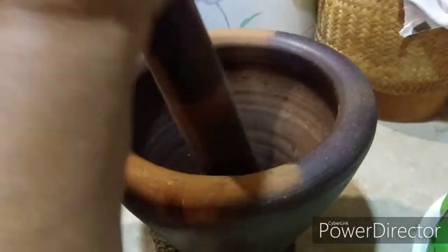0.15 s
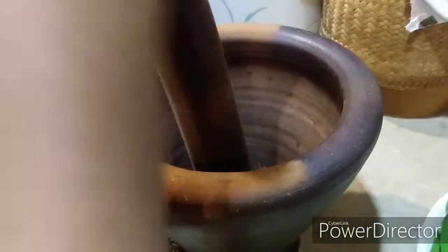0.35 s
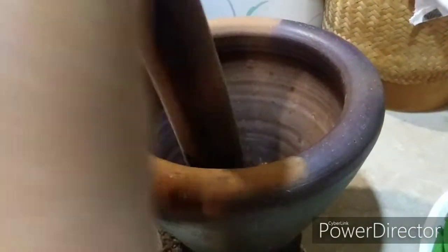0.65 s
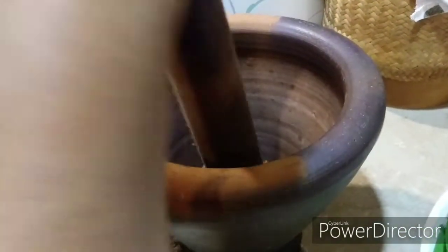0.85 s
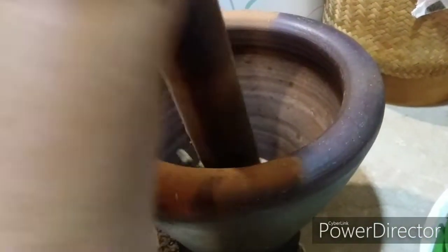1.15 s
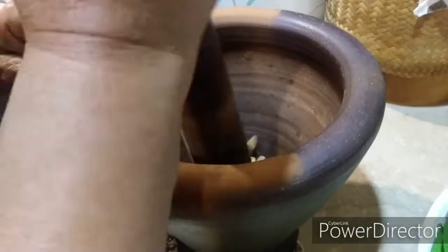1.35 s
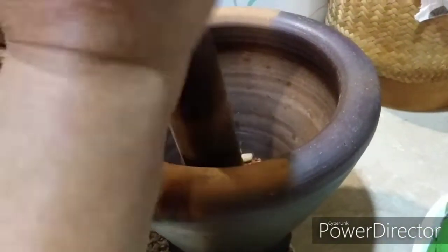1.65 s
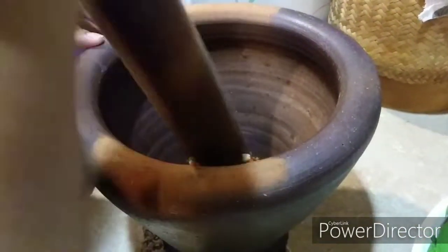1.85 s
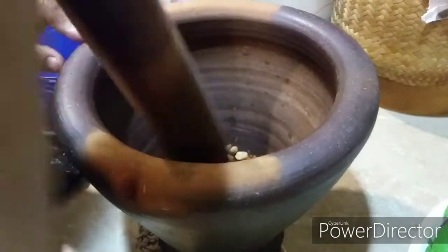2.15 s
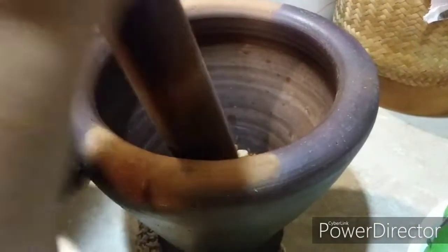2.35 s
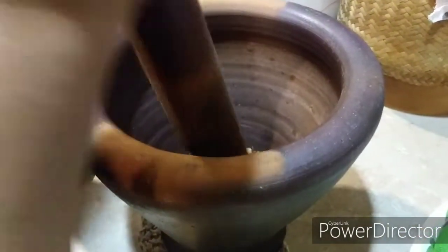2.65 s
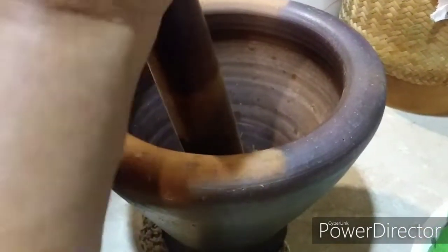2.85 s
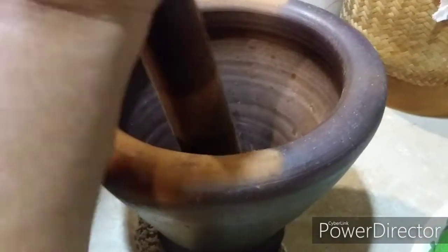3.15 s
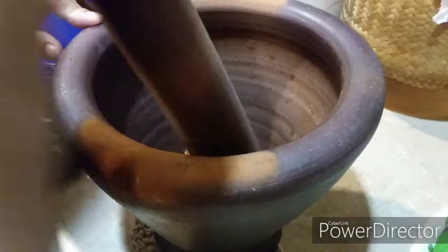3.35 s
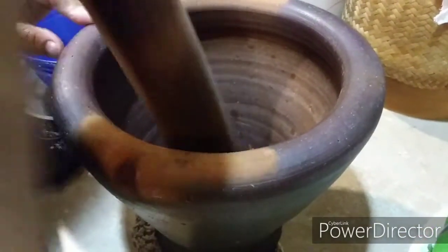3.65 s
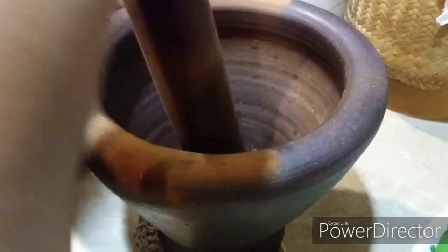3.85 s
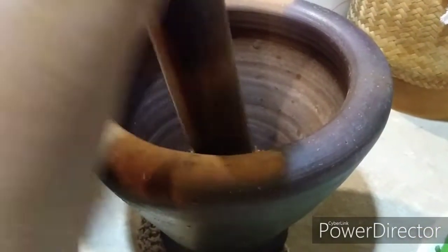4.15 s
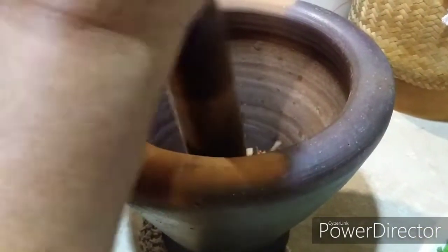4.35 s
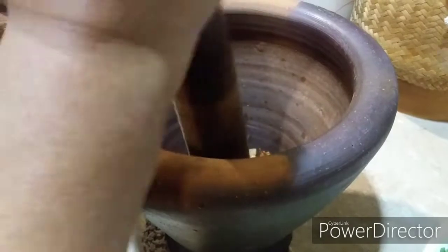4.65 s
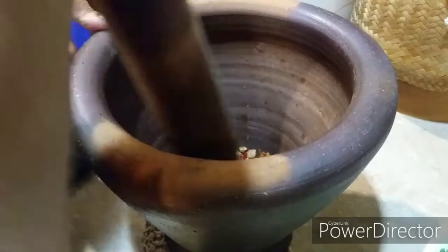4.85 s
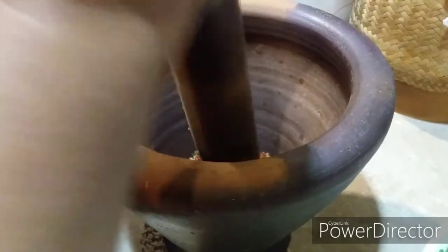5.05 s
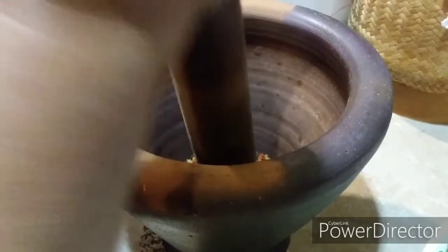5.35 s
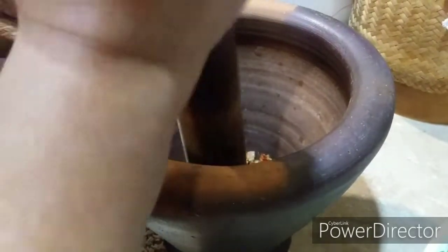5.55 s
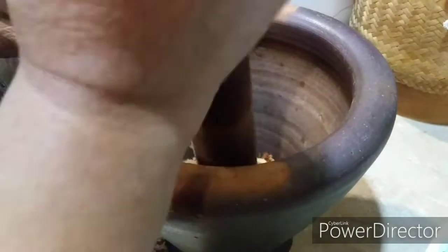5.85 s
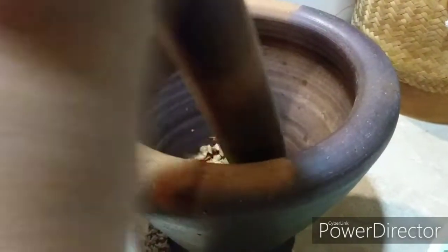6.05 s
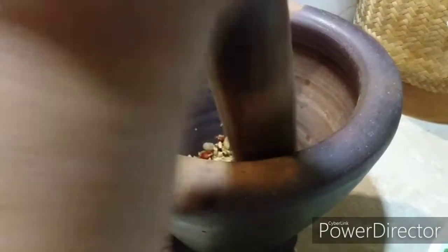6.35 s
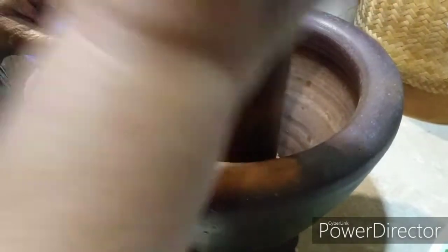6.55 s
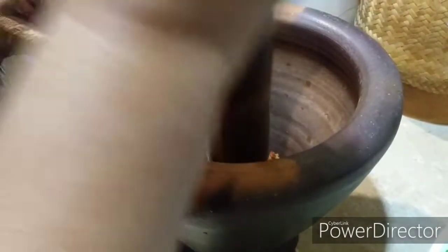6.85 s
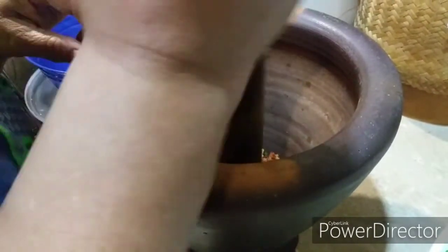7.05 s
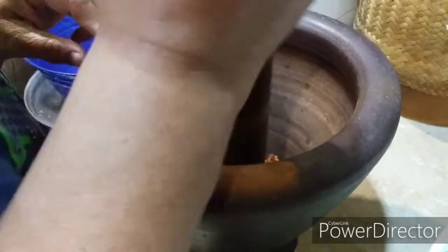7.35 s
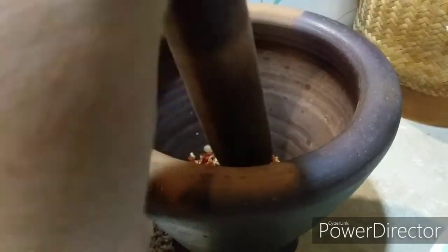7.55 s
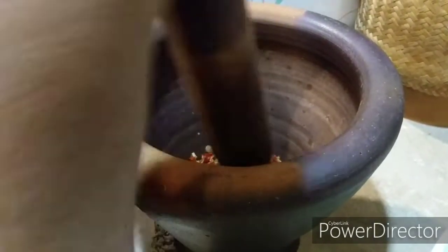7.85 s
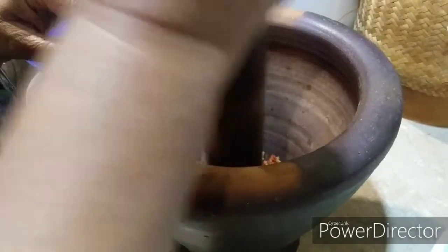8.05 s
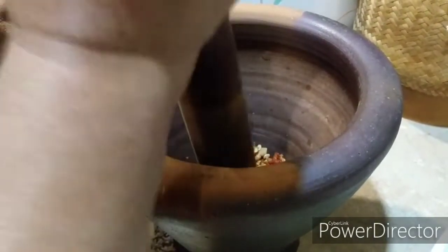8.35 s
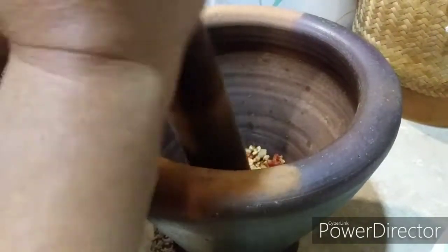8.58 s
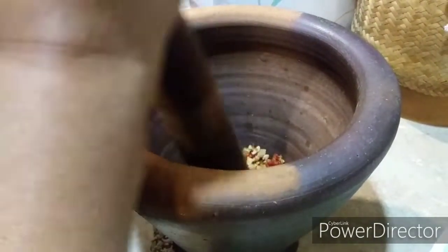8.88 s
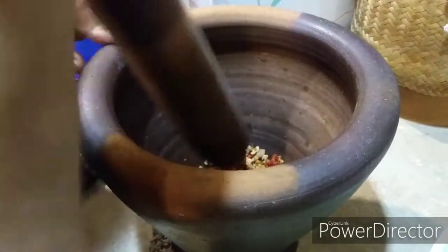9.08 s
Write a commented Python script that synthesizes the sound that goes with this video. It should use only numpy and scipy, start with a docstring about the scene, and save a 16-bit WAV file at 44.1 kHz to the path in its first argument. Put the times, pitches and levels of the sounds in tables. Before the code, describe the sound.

Close, even pounding of garlic and chilli in a clay mortar: bright crunches, hollow thuds and a few sharp raps of wood on clay.

```python
"""Pounding garlic and chilli

A wooden pestle works a clay mortar, a little over three strokes a second. Each stroke crushes the food
with a bright crunch and thuds through the mortar into the floor; some glance off the clay wall.
Crumbs tick and a plastic cup is jogged between strokes. A small hard room answers, and the close
microphone rings near 9 kHz."""
import sys
import numpy as np
from scipy import signal
from scipy.fft import rfft, irfft, next_fast_len
from scipy.io import wavfile

SR = 44100
rng = np.random.default_rng(int(sys.argv[2]) if len(sys.argv) > 2 else 0)


def wav_out(sig):
    """Save sig, one row per channel (or a flat mono array), as 16-bit PCM at SR to the path in sys.argv[1]."""
    wavfile.write(sys.argv[1], SR, np.round(np.clip(np.atleast_2d(sig).T, -1, 1) * 32767).astype(np.int16))


N = 406602
T = np.arange(SR // 2) / SR  # seconds within one hit

# Cue sheets; levels are relative within each layer.
# The pestle lands on the food. Each row: start in seconds, rise time and crush length in seconds,
# crunch level in dB, fall of the force over the crush in dB (negative swells), thud level in dB.
STROKES = [(0.465, 0.0048, 0.018, -17, 12.5, -40), (0.767, 0.0022, 0.019, -14.5, 0, -41),
           (1.055, .0005, .04, -17.5, -11, -41), (1.373, .0003, .023, -16, -13, -36.5),
           (1.673, 0.0021, 0.021, -15, -5, -35.5), (1.975, 0.0025, 0.017, -14, 0.5, -38),
           (2.28, 0.0014, 0.022, -16.5, 6, -36), (2.577, 0.00026, 0.022, -14, 4, -40.5),
           (2.861, 0.0015, 0.024, -15, -7.5, -37), (3.167, 0.0024, .016, -13, 8.5, -37.5),
           (3.453, 0.002, 0.032, -14.5, -4.5, -36.5), (3.777, 0.0027, 0.016, -14, 2, -37.5),
           (4.089, 0.0014, 0.015, -13, 4, -36), (4.392, 0.00088, 0.026, -14, 6.5, -36),
           (4.688, .0008, 0.025, -13, -1, -33), (4.984, 0.0012, 0.025, -15.5, 2.5, -37),
           (5.284, 0.0015, 0.016, -14, 3, -37), (5.5816, 0.00027, .021, -15, 11, -32.5),
           (5.858, 0.0012, .034, -23.5, -23.5, -36.5), (6.169, 0.0012, 0.026, -18.5, 1.5, -40),
           (6.483, .001, 0.016, -18.5, -15, -33), (6.773, 0.0012, 0.039, -20.5, -17, -38.5),
           (7.104, 0.0017, .026, -15, 2.5, -29), (7.393, .0003, 0.024, -14, 4, -40.5),
           (7.709, 0.0017, 0.023, -14.5, 9.5, -33), (8.016, 0.0013, 0.011, -13.5, 4, -36),
           (8.304, 0.0021, .029, -14, 1.5, -37), (8.609, .0003, 0.032, -23, -16.5, -38),
           (8.928, 0.0014, 0.017, -18, -4, -33)]
# Big pieces crack. Each row: start in seconds, level in dB, pitch of the pocket under the pestle in Hz.
SNAPS = [(.4624, -4, 2700), (.7733, -6.5, 2720), (1.6788, -10.5, 2530), (2.2802, -4, 4150),
         (2.8697, -6.5, 4570), (3.4823, -10.5, 4070), (4.9843, -11.5, 2360), (6.1921, -5.5, 3300),
         (6.8093, -7.5, 3430), (7.1048, -6, 4820), (7.3945, -5.5, 4080), (7.7098, -10, 2090),
         (8.017, -9.5, 2720), (8.636, -3, 2380), (8.9322, -5.5, 2340)]
# Wood meets bare clay. Each row: start in seconds, level in dB, time scale of the decay in seconds,
# brightness of the rap in dB per octave, level of the hollow thock in dB.
KNOCKS = [(.447, -33.5, .026, 8.5, -66), (0.464, -23, .018, 12.5, -37.5), (1.3755, -15.5, .025, -12, -27),
          (5.5816, -27, .12, -1, -28.5), (5.857, -8, 0.036, -4, -37.5), (6.173, -11.5, 0.33, -2.5, -29.5),
          (6.478, -8.5, 0.15, -3.5, -30), (6.7773, -7, 0.1, 0, -34.5), (7.394, -16.5, 0.024, -3, -54),
          (8.306, -18.5, 0.058, -10, -34.5), (8.6075, -9.5, 0.46, 1, -31.5), (8.931, -16, .044, -25, -27)]
# Small business around the strokes. Each row: start in seconds, level in dB.
HANDLING_BUMPS = [(.180, -36), (0.196, -41.5), (7.214, -41), (7.303, -46.5)]
CUP_JOGS = [(1.15, -32), (1.196, -29.5), (1.254, -38), (1.495, -37), (5.943, -39.5), (5.992, -37.5),
            (6.25, -29), (6.379, -35)]
TICKS = [(0.161, -48), (.32, -40.5), (0.648, -52), (.701, -41), (1.206, -14.5), (1.250, -28.5),
         (1.335, -32.5), (1.547, -32), (1.616, -29.5), (2.537, -41), (4.279, -43.5), (5.991, -33.5),
         (6.247, -22.5), (6.379, -32.5), (8.373, -28)]  # sharp and thin, some from crumbs, some from the cup's taps
# Loose food slides. Each row: crest of the swell in seconds, level in dB.
SLIDES = [(.08, -65.5), (1.18, -53.5), (5.82, -66.5), (7.601, -73.5)]

# Resonances. Each row: pitch in Hz, relative level in dB, time to die away by 60 dB in seconds.
STAND_AND_FLOOR_MODES = [(64, -9.5, 0.2), (84, -2.5, 0.15), (115.5, -7, 0.46), (140.6, 0, 0.4),
                         (166.8, -3.5, 0.2), (211.3, -10, 0.4), (255.7, -0.5, 0.23), (278.8, -6, 0.25),
                         (305, -4, 0.28), (336, -10, 0.51)]
HOLLOW_MODES = [(376, -10.5, 0.1), (431, 0, 0.1), (457.6, 1.5, 0.17), (504, 3, 0.14), (517.4, -1.5, 0.07),
                (594.3, -1, 0.16), (743, -10, 0.15), (841, -13.5, .18), (947, -11, 0.26),
                (1032, -13.5, 0.31)]  # the hollow of the bowl
PESTLE_MODES = [(1101, -18.5, 0.0055), (1310, -3, 0.018), (2238, -8.5, 0.012), (3130, -11, 0.019)]
CLAY_MODES = [(565, -5, 0.33), (810, -20.5, 0.22), (967, -1, 0.43), (980, -2.5, .2), (1025, 6.5, 0.54),
              (1178, -7, 0.86), (1350, 4, 0.46), (1285, 7, 0.25), (1500, -8, 0.084), (1465, -12.5, 0.14),
              (1750, -14, 1), (2030, -14.5, 0.3), (2120, -4.5, 0.97), (2225, -1, 0.2), (2500, -12, 0.28),
              (2450, 5.5, 0.23), (2470, -12.5, 0.85), (2480, -10.5, .2), (3210, 3, 0.24)]
CUP_MODES = [(2700, -1, .05), (3200, 0, .05), (3830, -10, .04), (4240, -6, .045), (5800, -15, .035)]

# Noise colours. Each row: frequency in Hz, relative level in dB.
CRISP_EQ = [(300, -22.5), (1500, -0.5), (4000, -7.5), (6000, -5), (8000, 3), (10000, 5), (12500, -6),
            (15500, -7)]  # brittle top end
JUICE_EQ = [(200, -16.5), (650, -22.5), (900, -10.5), (1100, -12), (1300, 1.5), (1650, -5), (2400, 5.5),
            (3300, 0), (4250, 4.5), (5500, -8), (9000, -15), (15000, -50)]  # wet midrange, also the cup's scratch
PUSH_EQ = [(25, -25.5), (60, -3.5), (150, 0.5), (300, -3.5), (450, -2), (800, -8.5), (3000, -41.5),
           (8000, -69)]  # low weight of a blow
THOCK_EQ = [(100, -19), (330, 3), (520, -5.5), (680, -10.5), (900, -6.5), (1400, -12), (2500, -14),
            (8000, -53)]  # dull, hollow body
CRACK_EQ = [(100, -31), (500, -18), (700, -6), (1000, -3), (1150, -6), (1350, 4.5), (1700, -1.5), (2300, 7),
            (3000, -12.5), (4200, -13.5), (6000, -32.5), (10000, -37.5)]  # wood on clay
TICK_EQ = [(500, -31.5), (2500, -11), (6000, -11.5), (7800, -1.5), (10000, -2.5), (12000, -11),
           (15500, -12)]  # thin ticks and rustle
AIR_EQ = [(25, -40.5), (60, -13.5), (140, -4.5), (200, -6), (310, 2.5), (500, -6.5), (1000, -12.5),
          (2400, -11.5), (5500, -22), (9000, -32), (15000, -24.5)]  # room tone
# The room's decay. Each row: frequency in Hz, time to die away by 60 dB in seconds.
ROOM_DECAY = [(100, 0.38), (500, 0.55), (2000, 0.41), (5000, 0.52), (9000, 0.35), (15000, 0.38)]


def crunch(lead_s=.025, rest_s=.007, juice_db=-10.5, drying_db_per_s=.26):
    """The pestle brushes the food, crushes it and comes to rest; the worked food slowly dries."""
    out = np.zeros(N)
    t = T - lead_s
    for start, rise, length, db, fall_db, _ in STROKES:
        press_db = fall_db * (.5 - np.clip(t / length, 0, 1))
        touch = np.exp(np.minimum(t, 0) / rise)
        rest = np.exp(-np.maximum(t - length, 0) / rest_s)
        force = amp(db + press_db) * touch * rest
        crisp = grains(CRISP_EQ, rate=1400, spread_db=3.5, clump_db=1, clump_rate=400)
        wet = grains(JUICE_EQ, rate=1200, spread_db=4, clump_db=1.5, clump_rate=280)
        wet_db = juice_db - drying_db_per_s * start
        add(out, start - lead_s, amp(-13.5) * shaped(crisp, force) + amp(wet_db) * shaped(wet, force))
    return out


def snaps():
    """A brittle piece breaks in an instant; the gap it leaves sets the pitch of its pop."""
    out = np.zeros(N)
    for start, db, hz in SNAPS + small_pieces(per_stroke=2):
        split = amp(-8) * noise(CRISP_EQ) * fade(.0057, .00015)
        cycles = T * hz
        pop = amp(-1) * np.sin(2 * np.pi * cycles) * np.exp(-cycles / 2)
        add(out, start, amp(db) * (split + pop))
    return out


def small_pieces(per_stroke, pocket_hz=2510, spread_octaves=.27):
    """Small pieces break in each crush, as hard as the pestle presses just then; rows as in SNAPS."""
    rows = []
    for start, _, length, db, fall_db, _ in STROKES:
        depth = scattered(per_stroke) ** 2  # most break early
        force_db = db + fall_db * (.5 - depth)
        pitch = pocket_hz * 2 ** (spread_octaves * rng.standard_normal(per_stroke))
        rows += zip(start + length * depth, force_db + 1, pitch)
    return rows


def thuds(cushion_s=.004025, usual_db=-36):
    """Delayed by the food, each blow sounds the bowl and rocks stand and floor, deeper when heavier."""
    out = np.zeros(N)
    swell = 1 - np.exp(-T / .0069)
    cutoff = np.exp(-(T / .095) ** 2)  # the low boom holds briefly, then cuts off quickly
    for start, *_, db in STROKES:
        hardness_db = -2.5 - .17 * (db - usual_db)
        boom = amp(10.5) * ring(STAND_AND_FLOOR_MODES, scatter_db=1.5, tilt_db=hardness_db)
        push = amp(-1) * noise(PUSH_EQ) * fade(.23, .0046)
        thud = boom * swell * cutoff + push + amp(-6.5) * hollow_thock()
        add(out, start + cushion_s, amp(db) * thud)
    return out


def hollow_thock():
    """The hollow of the bowl answers one blow."""
    hollow = amp(7.5) * ring(HOLLOW_MODES, scatter_db=2) * (1 - np.exp(-T / .0025))
    thock = amp(9) * noise(THOCK_EQ) * fade(.076, .0017)
    return hollow + thock


def knocks():
    """Wood raps on clay, which rings on unless the pestle stays against it; gives raps and thocks."""
    raps, thocks = np.zeros((2, N))
    for start, db, life, bright_db, thock_db in KNOCKS:
        wood = sum(amp(level) * np.sin(2 * np.pi * hz * T) * fade(t60, .0001)
                   for hz, level, t60 in tilted(PESTLE_MODES, bright_db))
        crack = amp(-.5) * noise(tilted(CRACK_EQ, bright_db)) * fade(.5 * life, .00019)
        clay = amp(-9) * ring(CLAY_MODES, scatter_db=1.5, tilt_db=2 * bright_db, pivot_hz=1300)
        damping = fade(2.8 * life, .0004)
        add(raps, start, amp(db) * (wood + crack + clay * damping))
        add(thocks, start, amp(thock_db) * hollow_thock())
    return raps, thocks


def cup(rock_s=.02, loss_db=10):
    """Each jog rocks the thin plastic cup through three ever weaker, scratchy taps."""
    out = np.zeros(N)
    for start, db in CUP_JOGS:
        for tap in range(3):
            wall = ring(CUP_MODES, scatter_db=2) * fade(.12, .0005)
            scratch = amp(-10.5) * grains(JUICE_EQ, rate=900, spread_db=7.5) * fade(.022, .0003)
            add(out, start + tap * rock_s, amp(db - tap * loss_db) * (wall + scratch))
    return out


def bumps():
    """Things being handled give soft, dull bumps."""
    out = np.zeros(N)
    for start, db in HANDLING_BUMPS:
        body = noise(THOCK_EQ) + amp(-10.5) * noise(PUSH_EQ)
        add(out, start, amp(db) * body * fade(.16, .0013))
    return out


def ticks(specks=30, growth_db_per_s=.8):
    """Crumbs and cup taps tick on cue; tiny specks fall at random, gradually louder."""
    out = np.zeros(N)
    speck_times = scattered(specks) * N / SR
    speck_db = -41.5 + growth_db_per_s * speck_times + 1.5 * rng.standard_normal(specks)
    for start, db in TICKS + list(zip(speck_times, speck_db)):
        tick = grains(TICK_EQ, rate=340, spread_db=10) * fade(.03, .00076)
        add(out, start, amp(db - 8.5) * tick)
    return out


def rustle(swell_s=.07, floor_db=-79, bits_per_s=2200):
    """Loose bits never quite settle, and their faint rustle swells when a heap slides."""
    t = np.arange(N) / SR
    swells = sum(amp(db) * np.exp(-((t - crest) / swell_s) ** 2) for crest, db in SLIDES)
    bits = (rng.random(N) < bits_per_s / SR) * rng.standard_normal(N)
    return (amp(floor_db) + swells) * colour(bits, TICK_EQ)


def room(x, build_s=.0079, cutoff_s=.16):
    """A diffuse room tail, drawn anew about once a stroke, its end cut short as by a noise suppressor."""
    out, block = np.zeros(N), SR // 3
    envelope = (1 - np.exp(-T / build_s)) * np.exp(-(T / cutoff_s) ** 2)
    for i in range(0, N, block):
        hz, t, bands = signal.stft(rng.standard_normal(len(T)), SR, nperseg=256)
        decay = np.exp(-np.log(1000) * t / along(ROOM_DECAY, hz)[:, None])
        tail = signal.istft(bands * decay, SR, nperseg=256)[1][:len(T)] * envelope
        add(out, i / SR, signal.fftconvolve(x[i:i + block], tail / np.linalg.norm(tail)))
    return out


def far_wall(x, delay_s=.0625, dull_hz=4970):
    """The far wall throws back one distinct, dulled slap."""
    out = np.zeros(N)
    add(out, delay_s, signal.lfilter(*signal.butter(2, dull_hz, fs=SR), x))
    return out


def air():
    """Quiet, steady room tone."""
    return colour(rng.standard_normal(N), AIR_EQ)


def grains(eq, rate, spread_db, clump_db=0, clump_rate=250):
    """Dense tiny fractures: noise that jumps in level by grain and by clump, at rates per second."""
    draws = np.clip(rng.standard_normal((2, len(T))), -2, 2)
    sizes = np.interp(T * rate, np.arange(len(T)), amp(spread_db * draws[0]))
    clumps = np.interp(T * clump_rate, np.arange(len(T)), amp(clump_db * draws[1]))
    return colour(rng.standard_normal(len(T)) * sizes * clumps, eq)


def ring(modes, scatter_db, tilt_db=0, pivot_hz=150):
    """Damped modes, balanced anew for each blow; the tilt lifts or cuts those above the pivot."""
    hz, db, t60 = np.transpose(modes)[:, :, None]
    gain = amp(db + scatter_db * rng.standard_normal(hz.shape))
    shelf = amp(tilt_db * np.clip(np.log2(hz / pivot_hz) / 1.3, 0, 1))
    gain = gain / np.linalg.norm(gain) * shelf
    phase = rng.uniform(0, 2 * np.pi, hz.shape)
    decay = np.exp(-np.log(1000) * T / t60)
    return np.sqrt(2) * np.sum(gain * decay * np.sin(2 * np.pi * hz * T + phase), axis=0)


def noise(eq):
    """Coloured noise, one hit long."""
    return colour(rng.standard_normal(len(T)), eq)


def colour(x, eq):
    """Run x through an EQ curve, at rms 1."""
    hz = np.fft.rfftfreq(len(x), 1 / SR)
    return unit(irfft(rfft(x) * amp(along(eq, hz)), len(x)))


def tilted(rows, db_per_octave):
    """Brighten or darken modes or an EQ curve around 1500 Hz."""
    return [(hz, db + db_per_octave * np.log2(hz / 1500), *rest) for hz, db, *rest in rows]


def along(curve, hz):
    """Read a curve on a log frequency axis."""
    points_hz, values = np.transpose(curve)
    return np.interp(np.log(hz + 1), np.log(points_hz + 1), values)


def fade(t60, attack_s):
    """A quick attack and a decay of 60 dB in t60 seconds."""
    return np.exp(-np.log(1000) * T / t60) * (1 - np.exp(-T / attack_s))


def shaped(x, envelope):
    """Shape x into a burst that carries the envelope's energy."""
    return unit(x * envelope) * np.sqrt(np.mean(envelope ** 2))


def scattered(count):
    """Random points from 0 to 1, one in each equal slot."""
    return (np.arange(count) + rng.random(count)) / count


def add(track, start, sound):
    """Mix a sound in at start seconds."""
    part = track[max(round(start * SR), 0):][:len(sound)]
    part += sound[:len(part)]


def amp(db):
    """Decibels to gain."""
    return 10 ** (np.asarray(db) / 20)


def unit(x):
    """Scale to rms 1."""
    return x / np.sqrt(np.mean(x ** 2) + 1e-20)


def scene():
    """Food, mortar and cup up close, with the room behind them."""
    crackle = crunch() + snaps() + ticks() + rustle()
    raps, thocks = knocks()
    clatter = raps + cup()
    low_end = thuds() + thocks + bumps()
    reverb = amp(-14.5) * room(crackle + amp(4.5) * clatter + amp(6.5) * low_end)
    slap = amp(-22.5) * far_wall(crackle + clatter)
    return (crackle + clatter + low_end + reverb + slap + amp(-61) * air())[None]


def record(dry, port_hz=8950, width_hz=900, bass_hz=48, top_hz=15600):
    """The microphone port rings, loud peaks round off, the sub-bass thins and the top ends steeply."""
    size = next_fast_len(N + SR // 2)
    hz = np.fft.rfftfreq(size, 1 / SR)
    resonance = 1j * hz * width_hz / (port_hz ** 2 - hz ** 2 + 1j * hz * width_hz)
    ringing = irfft(rfft(dry, size) * (1 + amp(17) * resonance), size)
    rounded = ringing / (1 + (ringing / .78) ** 4) ** (1 / 4)
    trimmed = signal.lfilter(*signal.butter(2, bass_hz, "high", fs=SR), rounded)
    return irfft(rfft(trimmed) / (1 + (hz / top_hz) ** 160), size)[:, :N]


dry = scene()
out = record(dry)
wav_out(out)
```